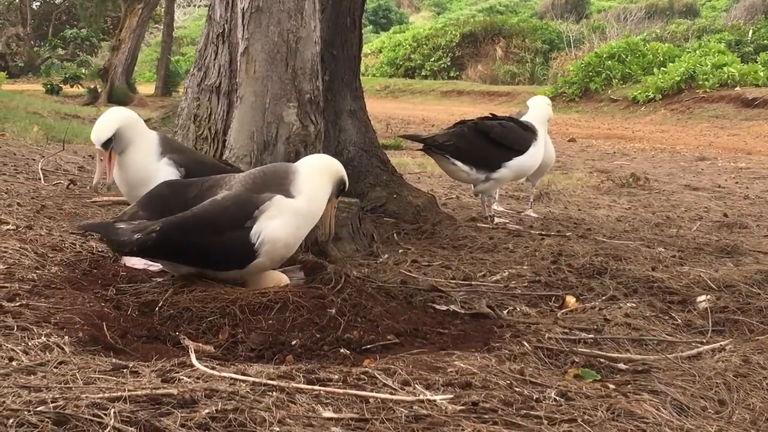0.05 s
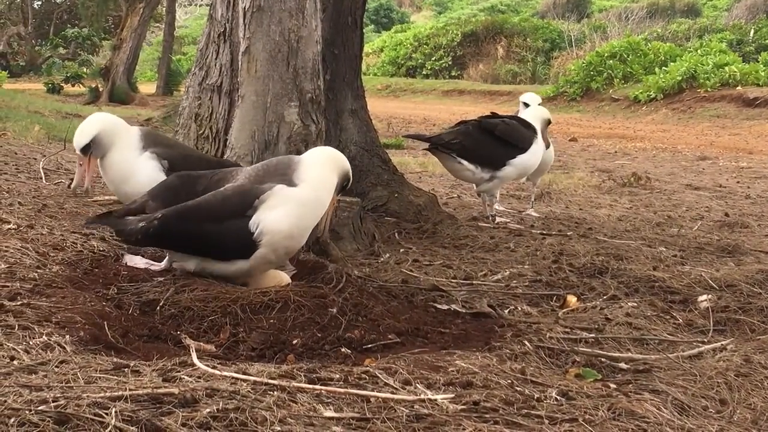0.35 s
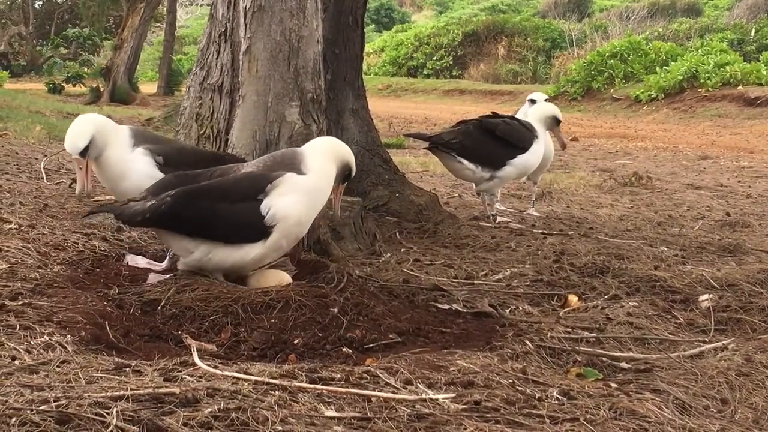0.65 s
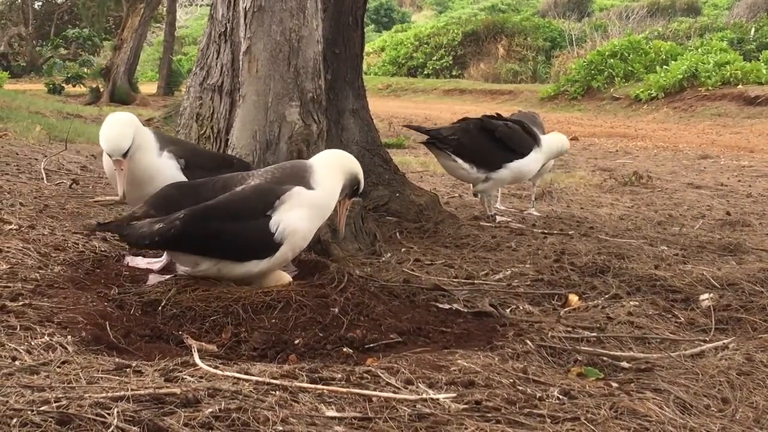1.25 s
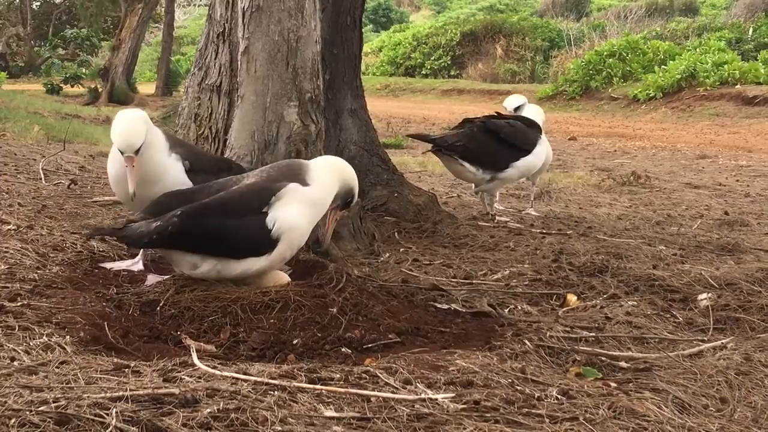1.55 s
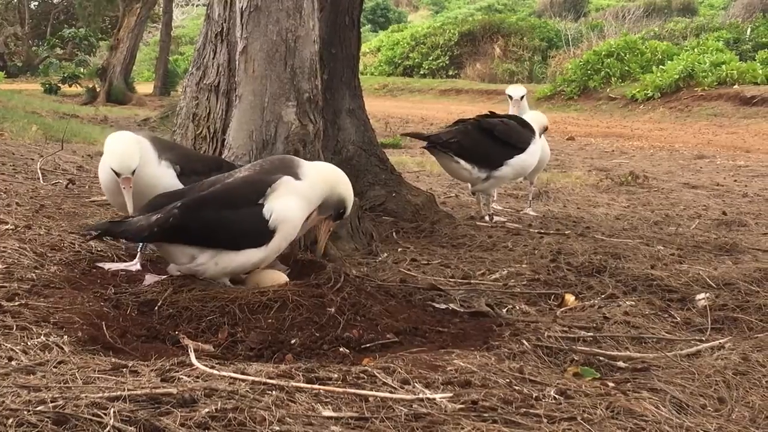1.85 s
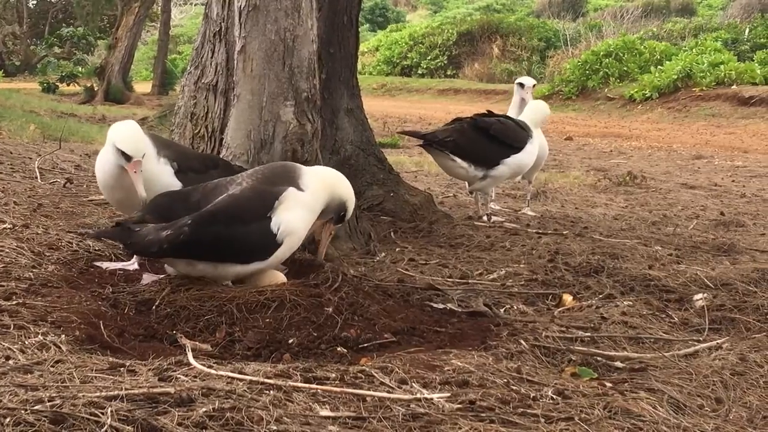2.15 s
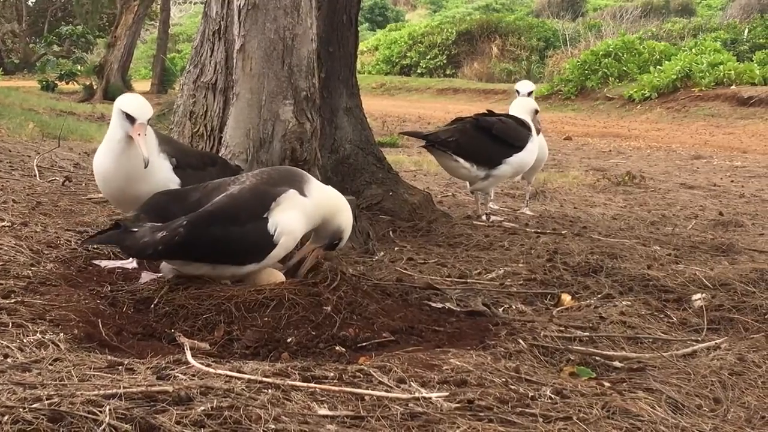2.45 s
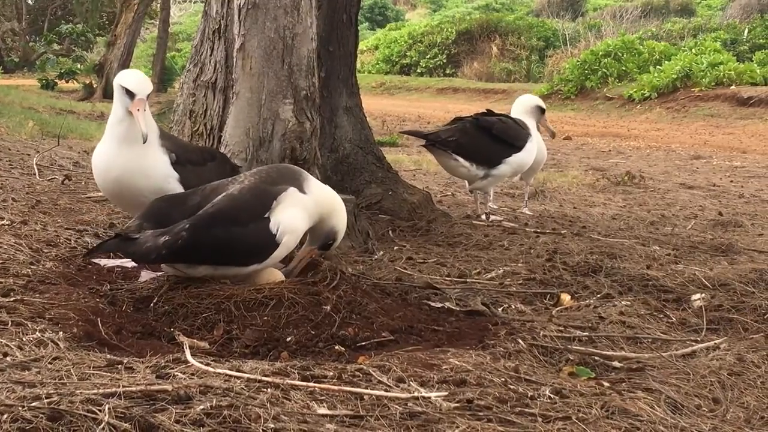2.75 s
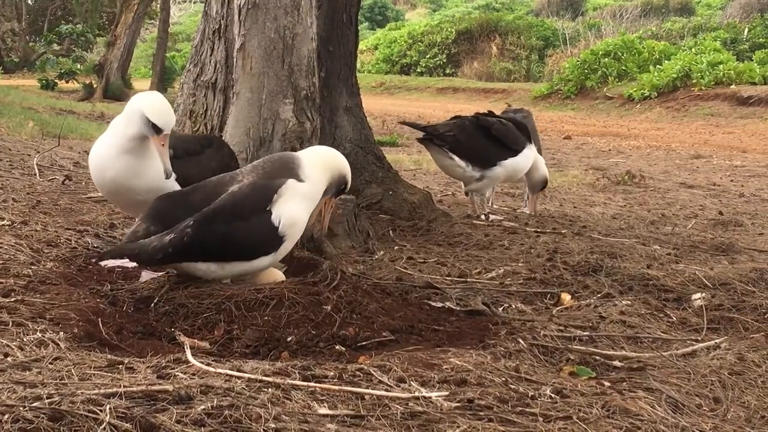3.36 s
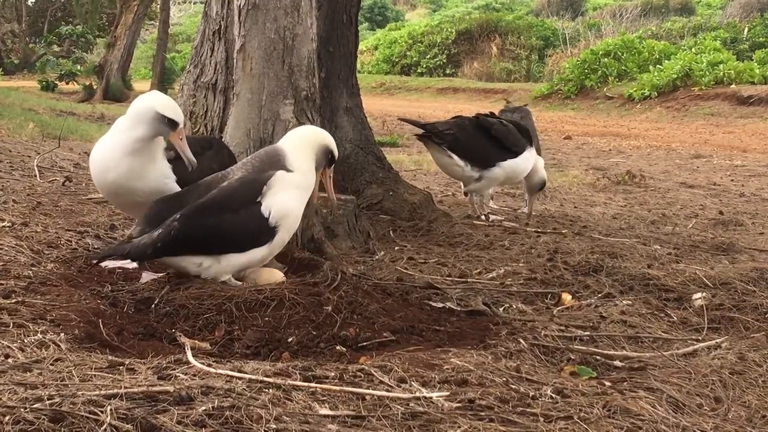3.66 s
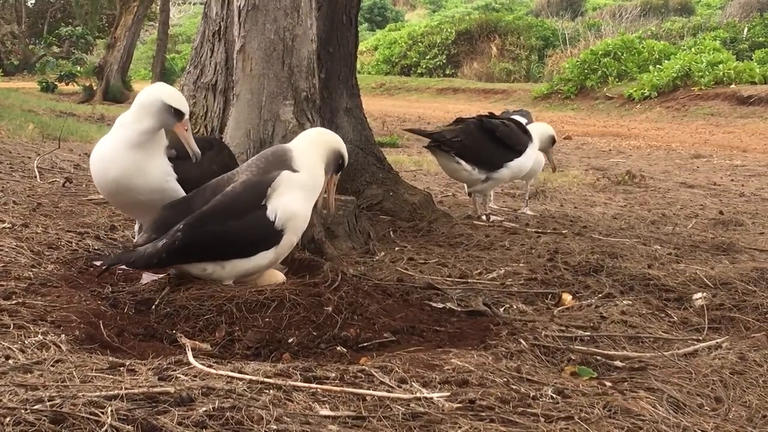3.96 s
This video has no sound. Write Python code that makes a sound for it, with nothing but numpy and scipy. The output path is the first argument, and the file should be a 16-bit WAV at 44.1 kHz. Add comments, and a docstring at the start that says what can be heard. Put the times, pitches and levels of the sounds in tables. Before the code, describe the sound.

Seabirds whinny, squeak and give nasal squawks, with faint bill clicks and low wind rumble.

```python
"""At a ground nest under a tree, albatrosses call while wind rumbles and rushes through the leaves.
A whistled whinny swings up and down and flips to a higher voice. Short squeaks follow.
Harsh nasal notes come and go: a buzz shaped by the throat, with rasp and hiss mixed in.
Bills click, the nest is softly bumped, and something ticks faintly and evenly.
The ground and the trunks give the birds a light echo."""
import sys
import numpy as np
from scipy import signal
from scipy.fft import rfft, irfft, next_fast_len
from scipy.io import wavfile
from scipy.ndimage import map_coordinates

SR = 44100
rng = np.random.default_rng(int(sys.argv[2]) if len(sys.argv) > 2 else 0)


def to_wav(s):
    """Save 16-bit WAV."""
    ch = np.atleast_2d(s).T  # columns
    pcm = np.round(np.clip(ch, -1, 1) * 32767)  # PCM
    wavfile.write(sys.argv[1], SR, pcm.astype(np.int16))


N = 176400  # 4 seconds


def amp(db):
    """Turn decibels into a number to multiply by."""
    return 10 ** (np.asarray(db) / 20)


def unit(x):
    """Scale a sound to an average (rms) level of 1."""
    return x / np.sqrt(np.mean(x ** 2) + 1e-20)


def clock():
    """The time of every sample, in seconds."""
    return np.arange(N) / SR


def along(colour, hz):
    """Read a colour, a table of how strong each frequency is, at hz."""
    points_hz, levels_db = np.transpose(colour)
    return np.interp(np.log(hz + 1), np.log(points_hz + 1), levels_db)


def wobble(rate):
    """A smooth curve through rate random values a second."""
    return map_coordinates(rng.standard_normal(int(N * rate / SR) + 4), [clock() * rate])


def filtered(x, response):
    """Turn each frequency up or down by response(hz)."""
    size = next_fast_len(len(x) + 8192)
    return irfft(rfft(x, size) * response(np.fft.rfftfreq(size, 1 / SR)), size)[:len(x)]


def noise(colour, size):
    """Noise with the given colour, at level 1."""
    return unit(filtered(rng.standard_normal(size), lambda hz: amp(along(colour, hz))))


def gate(t, start, end, edge_s):
    """Fade in at start and out at end."""
    return np.sin(np.pi / 2 * np.clip(np.minimum(t - start, end - t) / edge_s + .5, 0, 1)) ** 2


def taps(rows, colour, fade_s, attack_s=0.00014):
    """Short bursts of noise that die away by 60 dB in fade_s."""
    out, t = np.zeros(N + SR), np.arange(SR // 4) / SR
    shape = np.exp(-np.log(1000) * t / fade_s) * (1 - np.exp(-t / attack_s))
    for start, db in rows:
        out[round(start * SR):][:len(t)] += amp(db) * noise(colour, len(t)) * shape
    return out[:N]


def whistle(hz, gains, jitter, flutter_db=1.37):
    """An unsteady tone made of harmonics: waves at 1, 2, 3... times the pitch, one gain each."""
    phase = 2 * np.pi * np.cumsum(hz * (1 + jitter * wobble(700)[:len(hz)])) / SR
    return np.sqrt(2) * sum(gain * amp(flutter_db * wobble(89.54)[:len(hz)]) * np.sin(k * phase)
                            for k, gain in enumerate(gains, 1))


# Colours of the low rumble and of the air in the trees: frequency_hz, level_db
RUMBLE_COLOUR = [(20, -36), (30, -16), (42, -6.5), (55, -1), (66, 1), (80, -4), (110, -12), (170, -15.5),
                 (250, -24.5), (400, -36), (900, -68)]
AIR_COLOUR = [(100, 4), (280, 2), (400, -1.5), (500, -7.5), (620, 2), (760, -6), (1000, -8), (1250, -8),
              (1600, -13.5), (2200, -18), (3200, -30), (5000, -31), (9000, -35.5), (15500, -41.5)]
# Brief, irregular swells in the low rumble: time_s, boost_db
RUMBLE_SWELLS = [(.16, 4), (.25, 6.5), (.43, 7), (0.699, 6), (1.02, 5.5), (1.575, 7.5), (2.48, 5.5),
                 (2.58, 0.5), (2.96, 9), (3.11, 3), (3.42, 5), (3.98, 6.5)]
# Slow rise and fall of the air: time_s, change_db
AIR_DRIFT = [(0, 0), (1, 0.8), (1.8, .5), (2.2, -1), (2.7, 0), (3.3, -.5), (4, -0.5)]


def wind(rumble_db=-45, air_db=-56, swell_s=0.014):
    """Wind makes a low rumble and an even rush in the trees; the rumble flutters and briefly swells."""
    t = clock()
    swell_db = sum(db * np.exp(-((t - time) / swell_s) ** 2) for time, db in RUMBLE_SWELLS)
    rumble = noise(RUMBLE_COLOUR, N) * amp(rumble_db + swell_db + 1.1 * wobble(14))
    drift_db = np.interp(t, *np.transpose(AIR_DRIFT))
    air = noise(AIR_COLOUR, N) * amp(air_db + drift_db + 0.8 * wobble(4.18))
    return rumble + air


# One harsh note a row: throat_ring_hz, ring_boost_db, hiss_offset_db, path
# Each point on its path: time_s, pitch_hz, level_db, roughness (0 to 1)
HARSH_NOTES = [ (2460, 2.7, -7, [(0, 687, -63, 0.2), (.03, 650, -68.5, 0.1), (.08, 610, -89, .5)]),
               (3360, 6.5, -9, [(.605, 730, -67, 0.4), (.635, 757, -54, 0.15), (.655, 784, -63, 0.1),
               (.672, 917, -62, 0.5), (.70, 942, -55.5, 0.86)]), (3600, 8, -7, [(.956, 1090, -60, .45),
               (.98, 820, -60, .35), (1.003, 752, -55, .08), (1.04, 755, -63, .25), (1.07, 865, -62, .25),
               (1.118, 830, -72, .5)]), (2440, 9.4, -18, [(.98, 550, -64, 0.4), (1.0, 585, -72, 0.25),
               (1.04, 571, -55.5, .1), (1.08, 557, -61.5, .2), (1.11, 591, -74, .3)]),
               (2560, 5, -14, [(1.30, 908, -70, .7), (1.322, 768, -55, .3), (1.35, 685, -53, 0.3)]),
               (3950, 9, -11, [(1.351, 672, -53, .8), (1.374, 648, -54, .35), (1.401, 645, -50, .05),
               (1.43, 603, -56, .08), (1.465, 552, -70, .2)]), (2710, 15, -22, [(1.57, 720, -65.5, 0.75),
               (1.592, 663, -59.5, 0.5), (1.607, 643, -53.5, 0.08), (1.632, 658, -54.5, 0.03),
               (1.667, 595, -55, 0), (1.695, 601, -67, .2), (1.74, 557, -74, 0.6)]),
               (2920, 16, -18, [(1.838, 600, -71, .9), (1.862, 618, -66, .4), (1.88, 643, -51, .03),
               (1.901, 652, -47.5, .02), (1.922, 644, -53, .03), (1.955, 618, -69, .1)]),
               (3200, 17, -13, [(2.579, 659, -50.5, 0), (2.60, 671, -53.5, 0.02), (2.617, 705, -63, 0.14),
               (2.645, 706, -65, .04), (2.672, 693, -62, 0.06), (2.685, 726, -68, 0.3)]),
               (2900, 5.4, -9.5, [(2.684, 840, -64, .3), (2.702, 940, -66.5, 0.2), (2.722, 1026, -75, .3)]),
               (3330, 6.3, -22, [(3.452, 653, -60, 0.1), (3.472, 656, -62, 0), (3.50, 647, -83, .3)]),
               (2360, 9.4, -10.5, [(3.46, 722, -68, 0.3), (3.495, 712, -59, 0.06), (3.518, 729, -63.5, .15),
               (3.533, 902, -62.5, 0.4), (3.548, 973, -60, 0), (3.57, 1010, -75, 0.4)]),
               (3850, 6, -13, [(3.753, 720, -67, .95), (3.772, 700, -67, .3), (3.80, 667, -60, .08),
               (3.821, 651, -56, .04), (3.85, 630, -64, .15), (3.865, 620, -73, .5)]),
               (3600, 8.5, -9, [(3.86, 767, -76, .7), (3.885, 837, -65.5, 0.2), (3.91, 845, -78, .5)])]
# Colours of the throat and of the hiss above it: frequency_hz, level_db
THROAT_COLOUR = [(200, -25), (600, -1), (850, 6), (1350, -3), (2000, 4), (2600, 1), (3250, -5),
                 (4000, -5.5), (4800, -13), (5900, -10.5), (7000, -17.5), (8700, -17.5), (10500, -28),
                 (14000, -42)]
HISS_COLOUR = [(1500, -28), (3500, -14), (5000, -12), (7000, 0), (9000, 0), (11300, -7.5), (12000, -9),
               (15500, -16)]


def harsh_notes(edge_s=0.0042, ring_octaves=0.43, flutter_db=3.5, shimmer_db=2.07, rasp_db=-1.5):
    """A nasal buzz rings in the throat; roughness shakes its pitch and turns it into rasp."""
    out, shake, shimmer = np.zeros(N), wobble(1200), wobble(130)
    k = np.arange(1, 19)[:, None]  # harmonic numbers
    for ring_hz, boost_db, hiss_db, path in HARSH_NOTES:
        def throat(f):
            """The throat's gain, lifted around the frequency where it rings."""
            ring = np.exp(-(np.log2((f + 1) / ring_hz) / ring_octaves) ** 2)
            return amp(along(THROAT_COLOUR, f) + boost_db * ring)

        times, *columns = np.transpose(path)
        near = (clock() > times[0] - edge_s) & (clock() < times[-1] + edge_s)
        t = clock()[near]
        hz, db, rough = [np.interp(t, times, column) for column in columns]
        jitter = 0.0018 + 0.016 * rough
        phase = 2 * np.pi * np.cumsum(hz * (1 + jitter * shake[near])) / SR
        flutter = np.array([map_coordinates(row, [(t - t[0]) * 60])
                            for row in rng.standard_normal((len(k), 32))])
        gains = throat(k * hz) * amp(flutter_db * flutter)
        harmonics = gains * np.sin(k * phase + rng.uniform(0, 2 * np.pi, k.shape))
        buzz = harmonics.sum(0) / np.sqrt((gains ** 2).sum(0) / 2)
        pulses = 1 + np.cos(phase)  # the noise pulses in step with the buzz
        rasp = unit(filtered(rng.standard_normal(len(t)) * pulses, throat))
        hiss = unit(filtered(rng.standard_normal(len(t)) * pulses, lambda f: amp(along(HISS_COLOUR, f))))
        voice = amp(db) * (np.sqrt(1 - rough) * buzz + amp(rasp_db) * np.sqrt(rough) * rasp)
        voice += hiss * amp(-62 + hiss_db + 0.63 * (db + 60))  # hiss swells less than the voice
        out[near] += voice * amp(shimmer_db * shimmer[near]) * gate(t, times[0], times[-1], edge_s)
    return out


# Colour of a tick: frequency_hz, level_db
TICK_COLOUR = [(500, -15), (3800, 3), (5500, -2), (7500, -17), (12000, -9), (15000, 3)]


def ticks(first_s=.1588, every_s=.3, level_db=-58):
    """A faint, dry tick repeats evenly, each a little louder or softer."""
    rows = [(start, level_db + rng.normal(0, 1.7)) for start in np.arange(first_s, N / SR, every_s)]
    return taps(rows, TICK_COLOUR, fade_s=0.012)


# Single clicks: start_s, level_db
CLICKS = [(.159, -59), (1.783, -66), (2.148, -58.5), (2.492, -62), (2.561, -72), (2.787, -61.5),
          (2.860, -61), (3.157, -57)]
# Colour of a click: frequency_hz, level_db
CLICK_COLOUR = [(500, -16), (2500, 3), (5300, 3), (7000, -14), (12000, -12), (15000, -2.5)]


def clicks():
    """Short, bright clicks: the first makes the first even tick a little louder; the rest are bills."""
    return taps(CLICKS, CLICK_COLOUR, fade_s=0.016)


# Upward swings of the whinny: peak_s, before_s, after_s, top_hz, base_db, octave_db
# The base is the lowest harmonic; the octave is twice as high.
SWINGS = [(.323, 0.014, 0.016, 2840, -68.5, -64), (.433, 0.019, 0.023, 2974, -50.5, -55),
          (.541, 0.032, 0.036, 3170, -52.5, -52.5), (.635, 0.044, 0.036, 3090, -56.5, -54),
          (.712, 0.05, 0.05, 3170, -62, -53), (.788, 0.032, 0.047, 3170, -56.5, -56.5),
          (.865, 0.03, 0.036, 3170, -54.5, -57), (.938, 0.043, 0.042, 3086, -55, -52),
          (1.015, 0.035, 0.027, 3000, -62, -50), (1.099, .020, 0.015, 2873, -51.5, -56),
          (1.197, 0.027, 0.035, 2995, -58.5, -52.5), (1.314, 0.025, 0.03, 2920, -68, -58.5),
          (1.426, 0.013, 0.0098, 2916, -67.5, -51)]
# Flips to the higher voice: start_s, length_s, pitch_hz, base_db, octave_db
FLIPS = [(0.528, 0.026, 3325, -51, -52.5), (0.702, 0.019, 3276, -53.5, -47),
         (.775, 0.025, 3277, -55.5, -48.5), (0.853, 0.026, 3340, -55, -49.5)]


def whinny(low_hz=2752.0, swing_s=.023, sag_hz=44, edge_s=0.0024):
    """A whistle swings up about eleven times a second; four swings flip to a higher voice."""
    t = clock()
    hz = np.full(N, low_hz)
    base, octave, flipped = np.zeros((3, N))
    for peak, before, after, top_hz, base_db, octave_db in SWINGS:
        arch = np.exp(-((t - peak) / swing_s) ** 2)
        hz += (top_hz - low_hz) * arch
        dip_db = -3.5 - 7 * (1 - arch)  # quieter away from the peak
        effort = gate(t, peak - before, peak + after, edge_s) * amp(dip_db)
        base += effort * amp(base_db)
        octave += effort * amp(octave_db)
    for start, length, flip_hz, base_db, octave_db in FLIPS:
        flip = gate(t, start, start + length, edge_s)
        progress = np.clip((t - start) / length, 0, 1)
        hz += flip * (flip_hz - sag_hz * progress ** 2 - hz)
        base += flip * (amp(base_db) - base)
        octave += flip * (amp(octave_db) - octave)
        flipped += flip
    base *= amp(1.5 * wobble(120))
    third = octave * amp(-20.5 + 3.5 * flipped)
    fourth = octave * amp(-28 - 5 * flipped)
    return whistle(hz, [base, octave, third, fourth], jitter=0.0014)


# One squeak a row: start_s, length_s, first_hz, middle_hz, last_hz, harmonics_db (five levels)
SQUEAKS = [(1.959, 0.014, 2610, 2500, 2450, [-53, -73, -84, -90, -90]),
           (2.540, 0.037, 2590, 2790, 2530, [-46.5, -57, -69, -66, -88]),
           (2.938, 0.022, 2510, 2480, 2467, [-57, -59, -79, -70.5, -92]),
           (3.425, 0.029, 2660, 2790, 2700, [-63, -66.5, -64.5, -59, -77])]


def squeaks():
    """Short squeaks of the whistling voice, each arching or sliding down in pitch."""
    out = np.zeros(N)
    for start, length, first_hz, middle_hz, last_hz, harmonics_db in SQUEAKS:
        near = abs(clock() - start - length / 2) < length
        t = clock()[near]
        progress = np.clip((t - start) / length, 0, 1)
        slide_hz = first_hz + (last_hz - first_hz) * progress
        bend_hz = (middle_hz - (first_hz + last_hz) / 2) * np.sin(np.pi * progress) ** 2
        tone = whistle(slide_hz + bend_hz, amp(harmonics_db), jitter=.003)
        out[near] += tone * gate(t, start, start + length, edge_s=.005)
    return out


# Bumps on the nest: start_s, level_db
NEST_BUMPS = [(2.026, -51), (3.85, -48), (3.883, -41)]
# Colour of a bump: frequency_hz, level_db
BUMP_COLOUR = [(80, -2), (180, -4), (400, -6), (700, -10), (1500, -22), (4000, -48), (9000, -90)]


def nest_bumps():
    """Soft bumps on the nest make low, dull thuds."""
    return taps(NEST_BUMPS, BUMP_COLOUR, fade_s=0.056, attack_s=0.0028)


# Echoes from the ground and trunks: delay_s, level_db
ECHOES = [(.0043, -12.5), (.0125, -23), (0.029, -23.5)]
# Colour laid over the echoes and their tail: frequency_hz, level_db
ECHO_COLOUR = [(1000, -4.5), (3000, 3), (4300, -6.5), (6000, -4.5), (12000, -15)]


def add_echo(x, tail_db=-14.5, fade_s=.3):
    """Sound bounces off the ground and trunks and comes back duller, with a thin tail."""
    t = np.arange(SR // 2) / SR
    tail = rng.standard_normal(len(t)) * np.exp(-np.log(1000) * t / fade_s)
    bounces = amp(tail_db) * tail / np.linalg.norm(tail)
    for delay, db in ECHOES:
        bounces[round(delay * SR)] += amp(db)
    echo = signal.fftconvolve(x, bounces)[:N]
    return x + filtered(echo, lambda hz: amp(along(ECHO_COLOUR, hz)))


def scene():
    """Mix the echoing calls and clicks with bumps, ticks and wind in one channel."""
    calls = whinny() + squeaks() + harsh_notes()
    return (add_echo(calls + clicks()) + nest_bumps() + ticks() + wind())[None]


def record(dry):
    """Cut away the very highest treble."""
    return np.array([filtered(x, lambda hz: hz < 15750) for x in dry])


dry = scene()
out = record(dry)
to_wav(out)
```